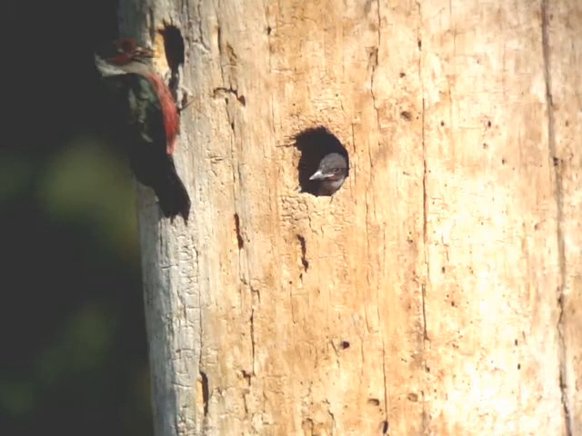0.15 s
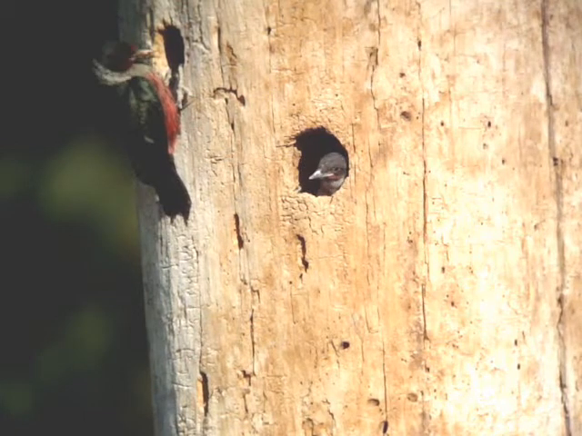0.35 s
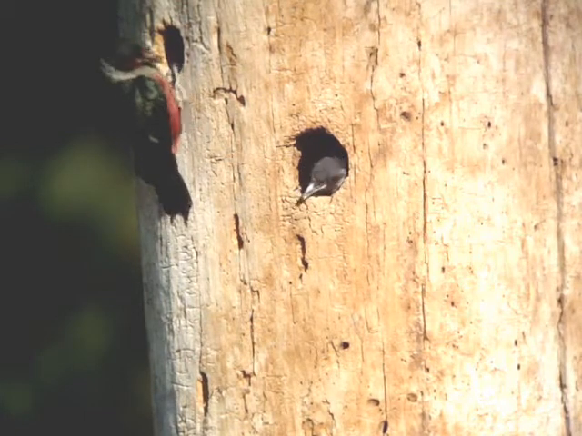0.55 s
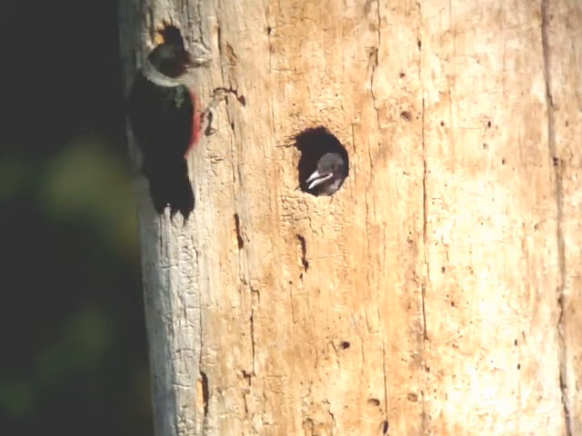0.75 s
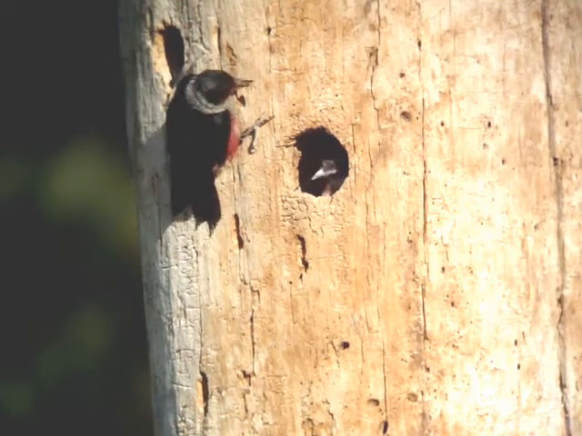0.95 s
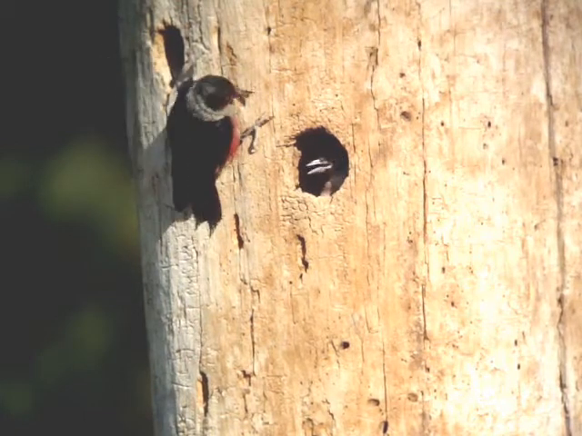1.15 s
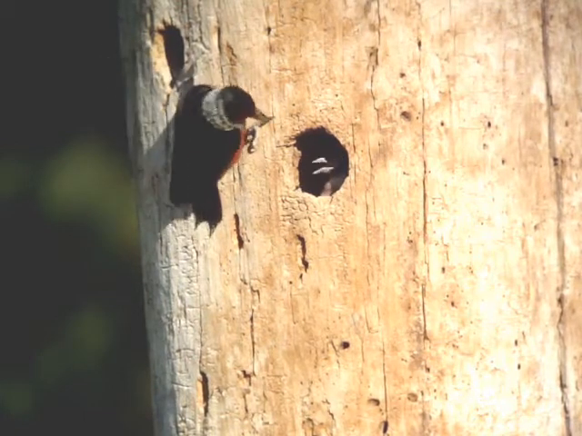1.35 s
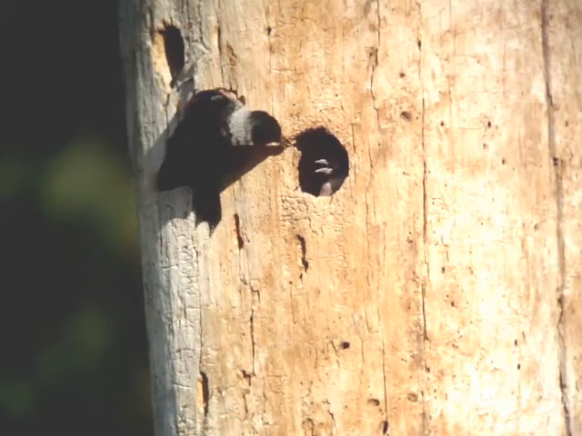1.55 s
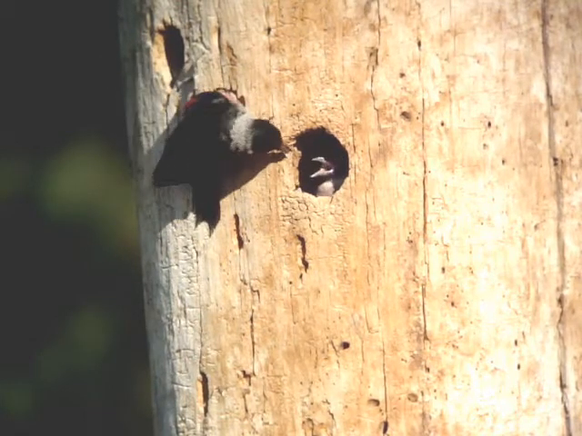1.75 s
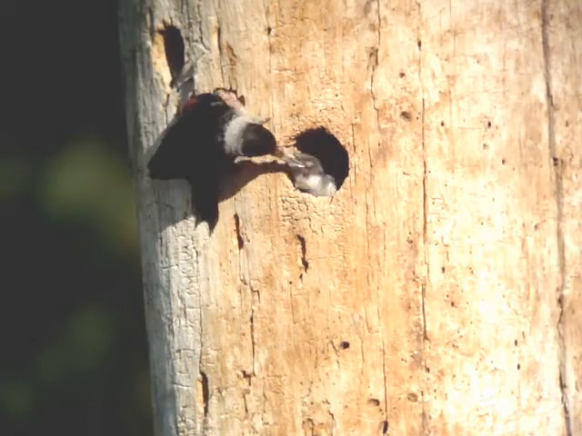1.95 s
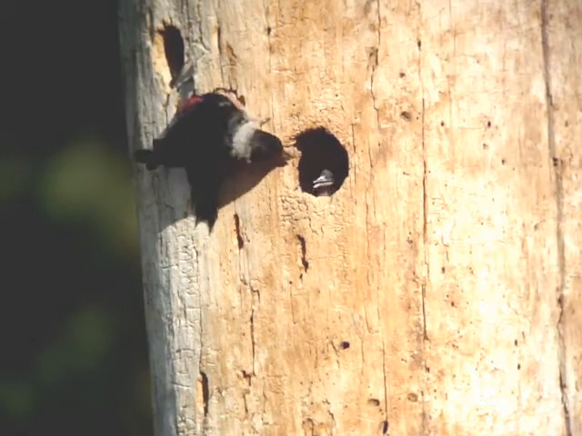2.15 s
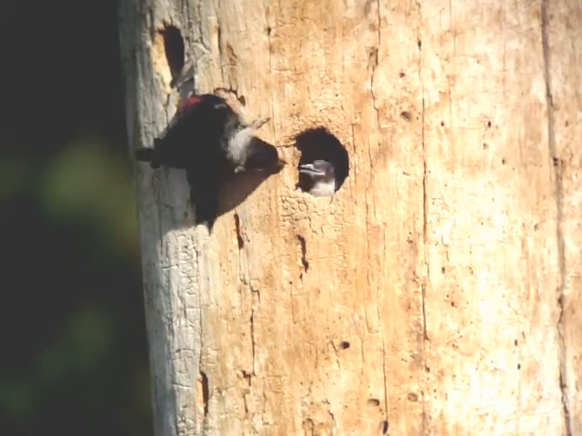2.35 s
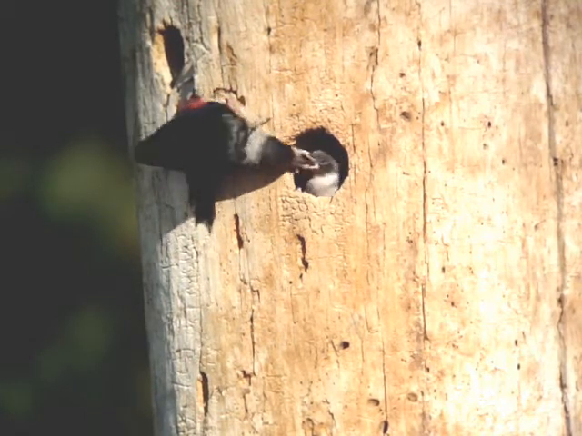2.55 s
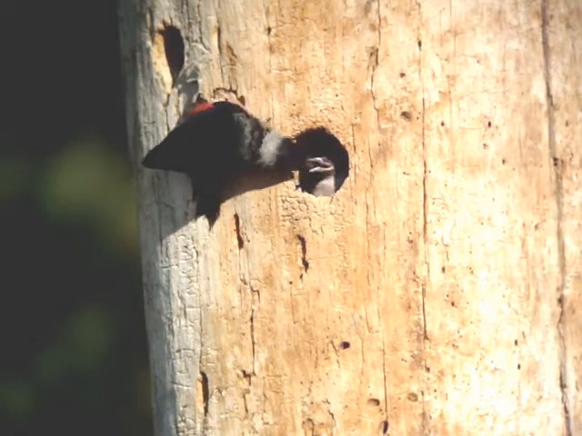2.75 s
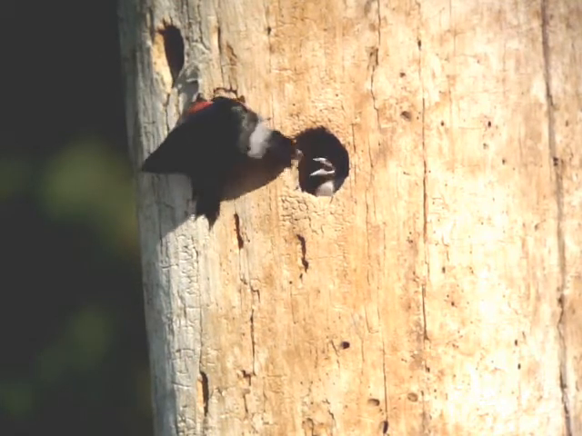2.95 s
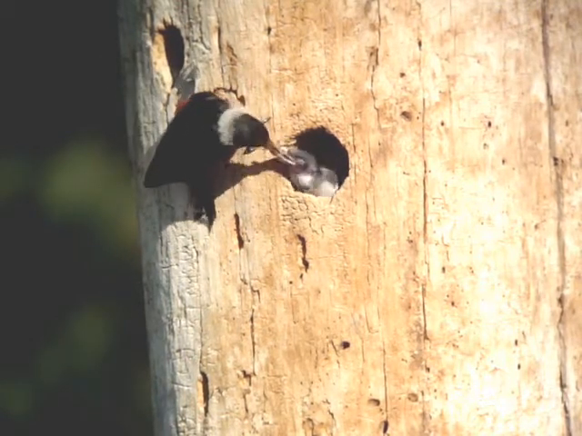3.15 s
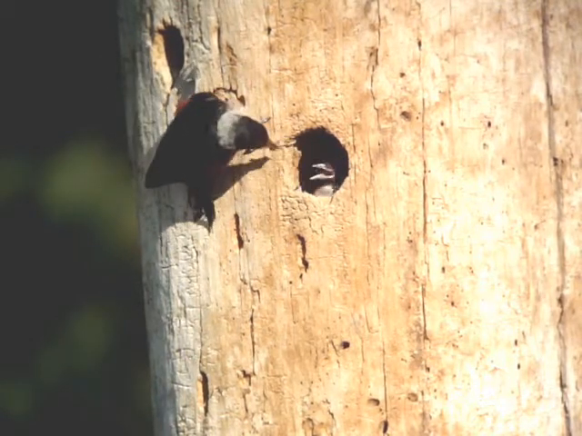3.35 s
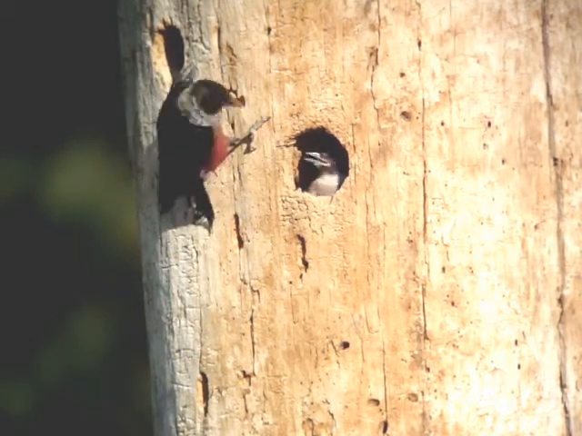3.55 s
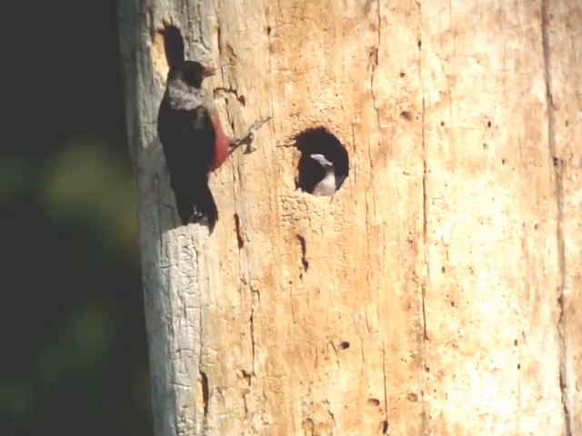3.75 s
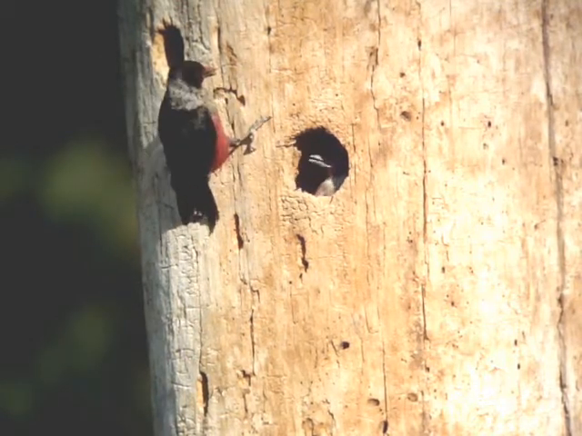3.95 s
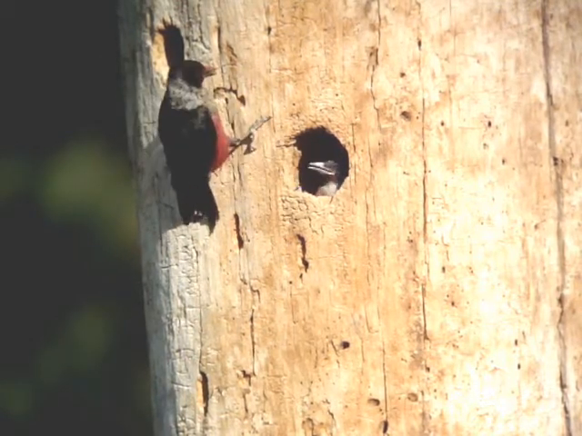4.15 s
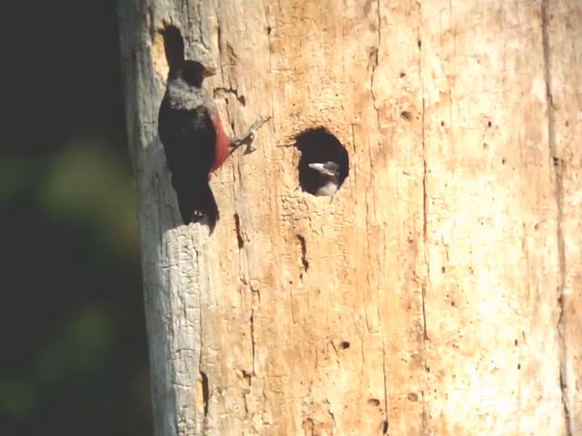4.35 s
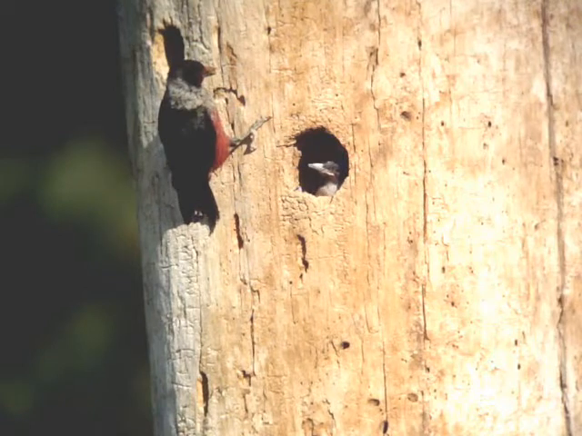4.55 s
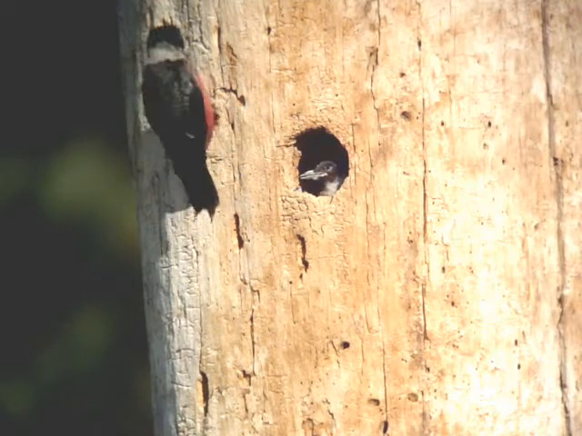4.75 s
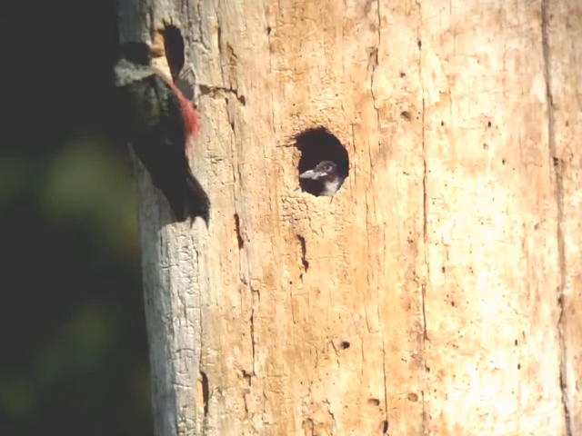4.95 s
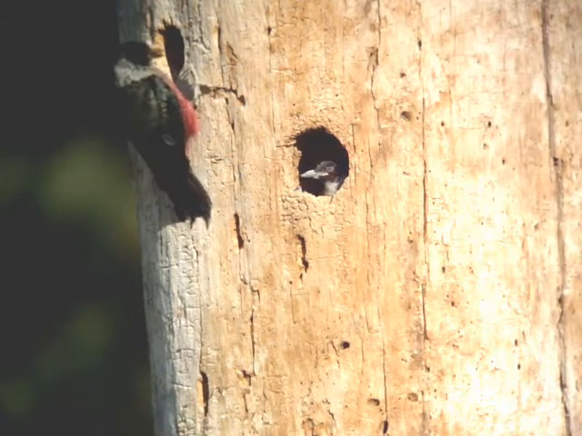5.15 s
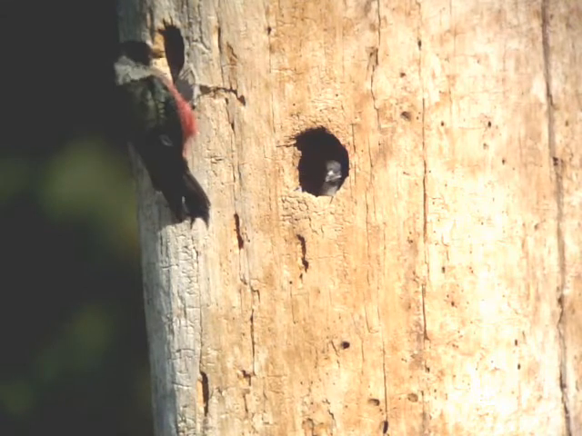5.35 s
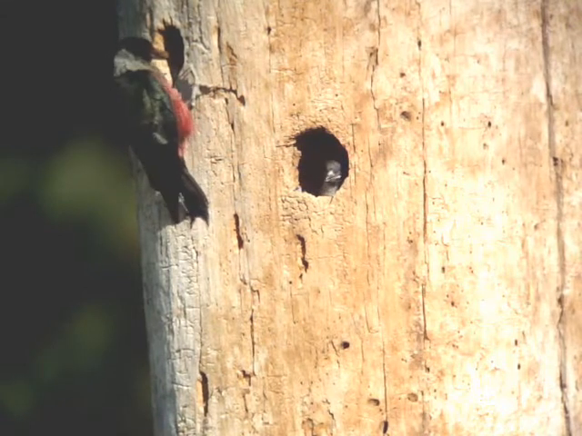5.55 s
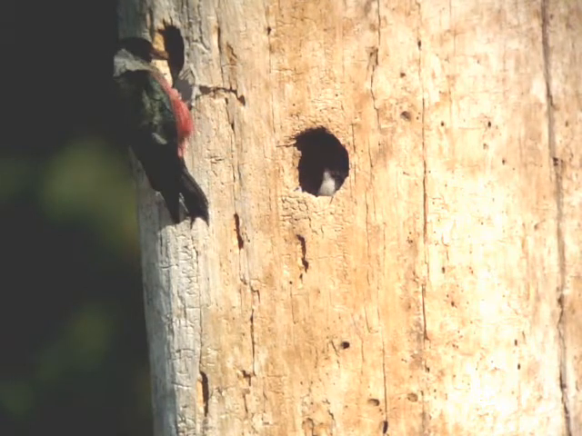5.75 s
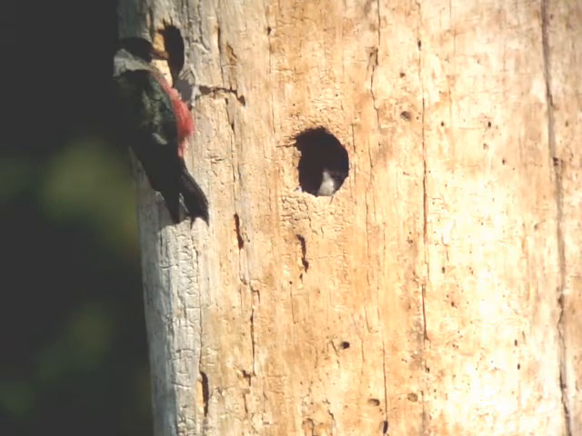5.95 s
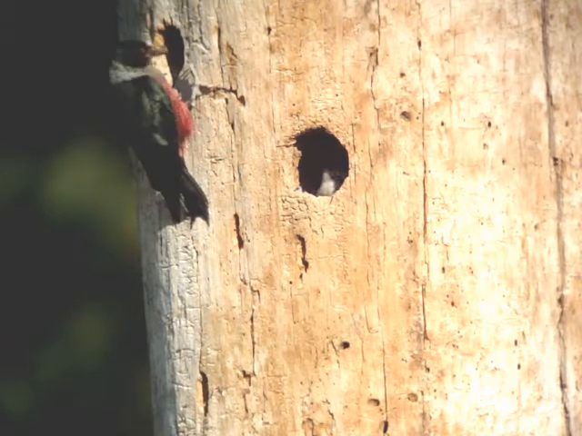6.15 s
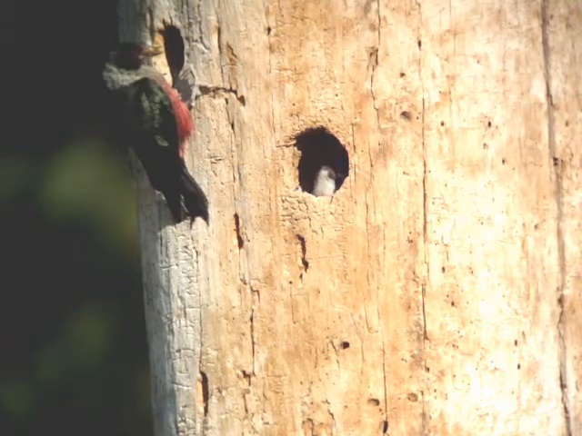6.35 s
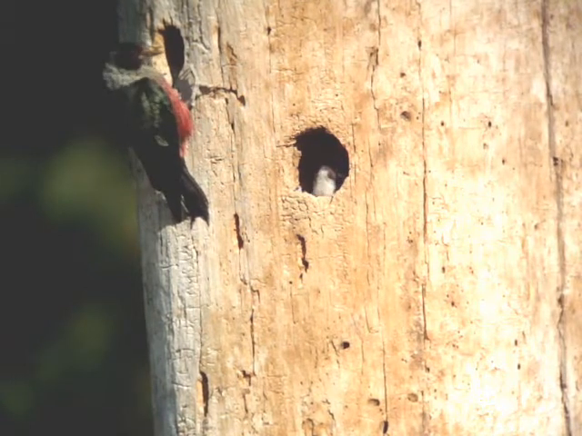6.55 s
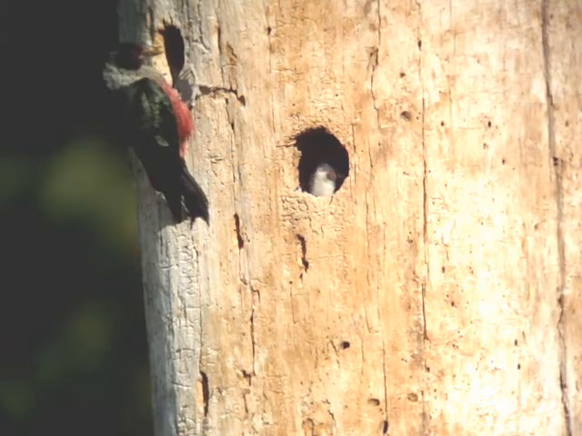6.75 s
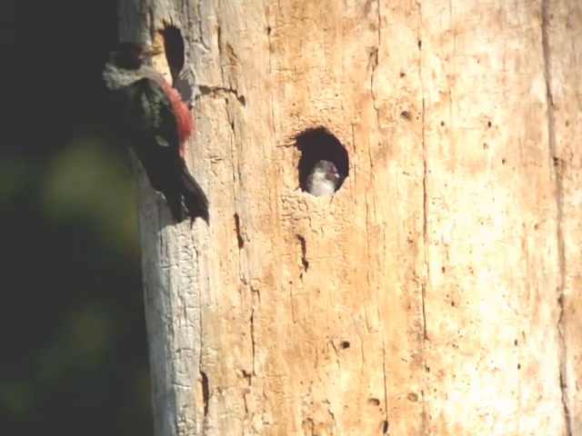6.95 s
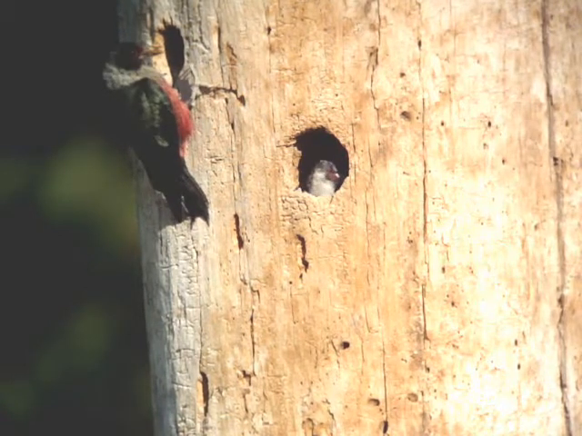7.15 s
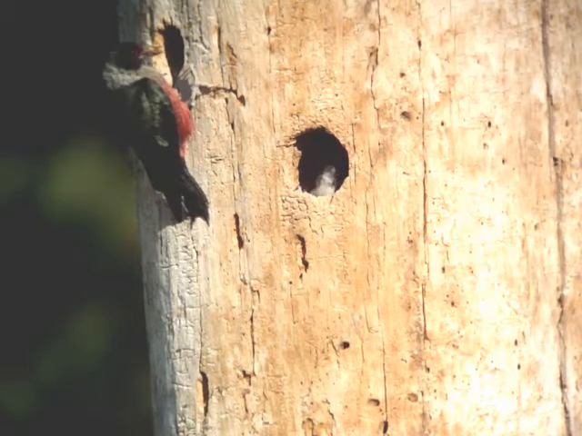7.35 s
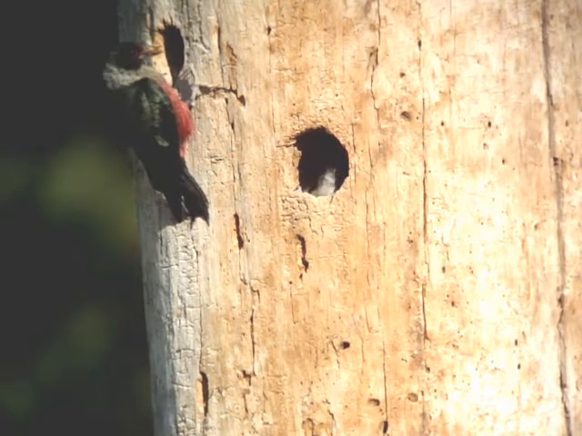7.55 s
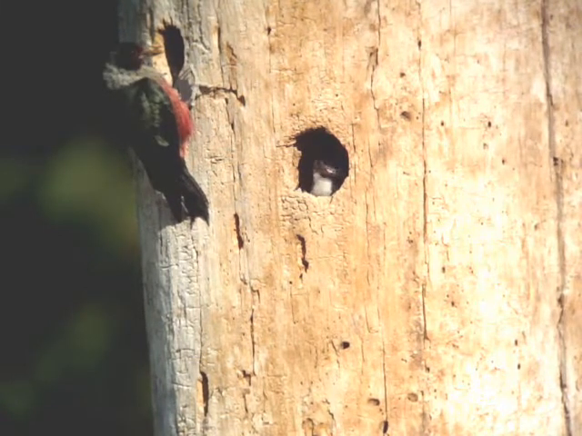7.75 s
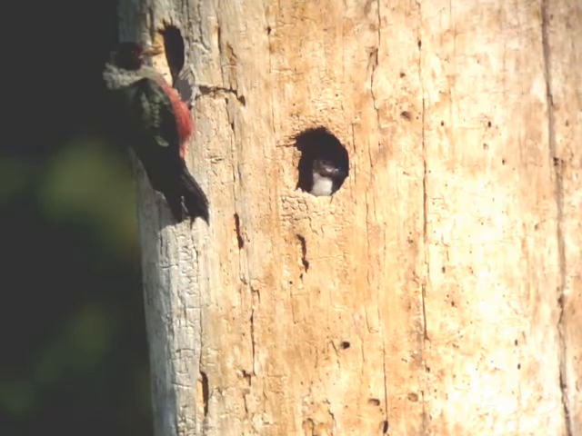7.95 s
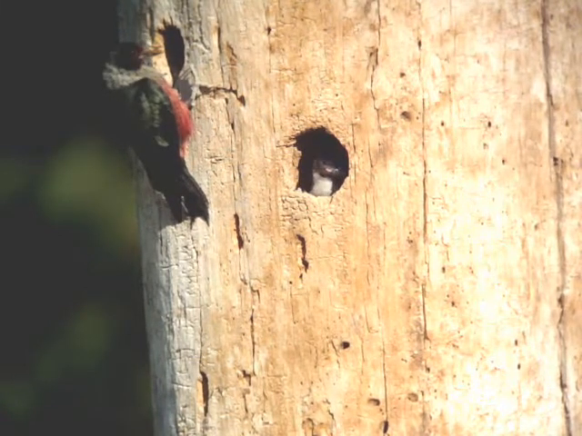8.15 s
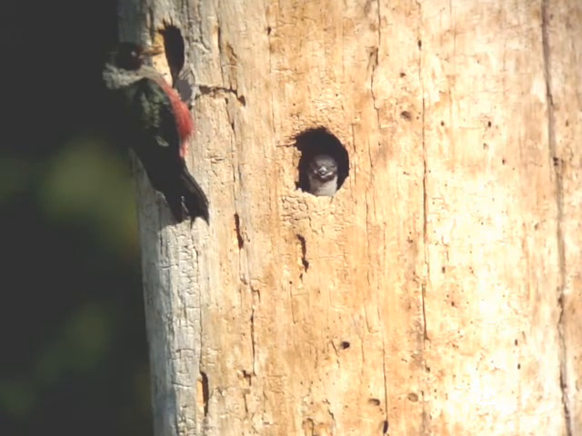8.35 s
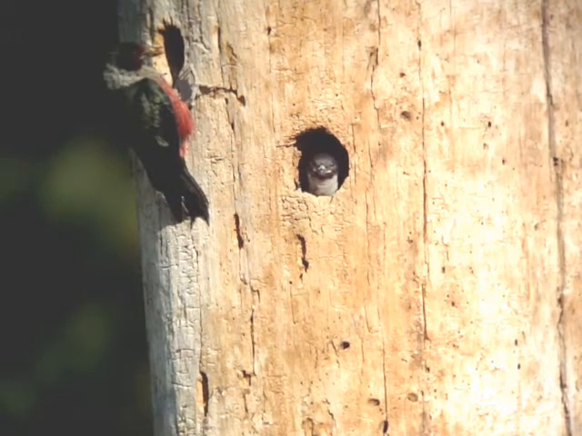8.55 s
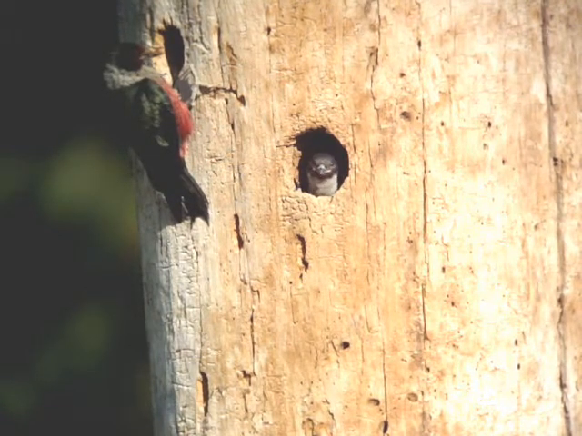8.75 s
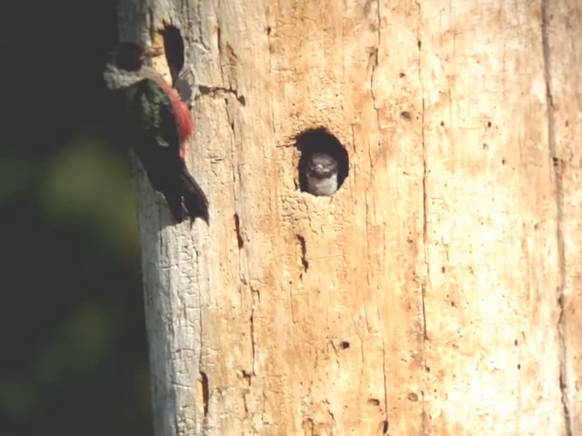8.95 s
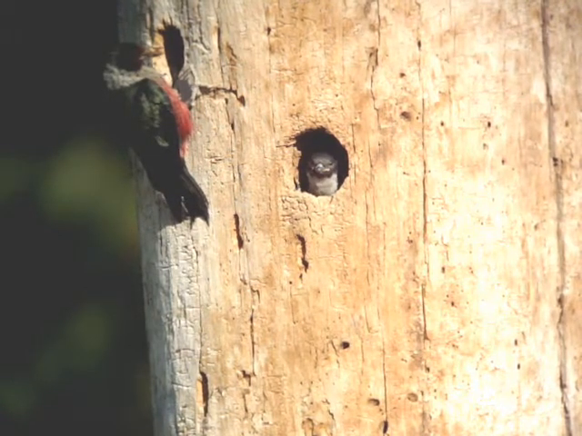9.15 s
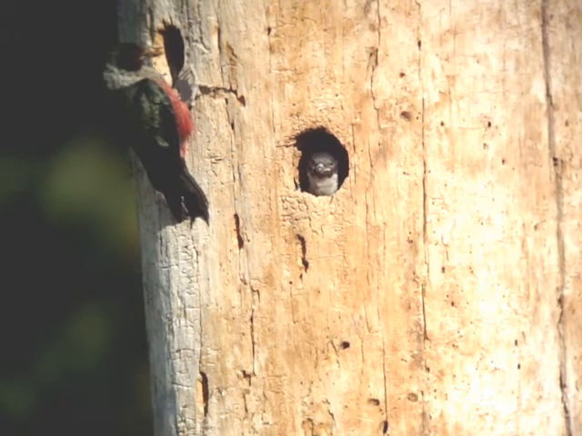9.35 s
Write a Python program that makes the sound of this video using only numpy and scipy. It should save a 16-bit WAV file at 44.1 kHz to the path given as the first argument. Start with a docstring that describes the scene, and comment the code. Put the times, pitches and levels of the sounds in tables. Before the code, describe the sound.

Quiet woodland with a soft, even hush. One young bird begs with scratchy, noisy, nasal squawks, some sagging in pitch as they fade. During feeding the voice turns frantic, with abrupt cracks and very short high whistled squeaks. It then settles into separate raspy calls, weaker around six to seven seconds, and ends with a rapid low chatter. The microphone hears it clearly, with tight reflections from the hole and a slight dull echo from the trees.

```python
"""In a wood, at a hole in a dead trunk, a woodpecker nestling begs while a parent comes to feed it.
A short stuttering churr opens and closes the series. Between them a rough, chaotic syrinx rasps near 2 kHz
through fixed throat resonances, and at the feeding a pure tone breaks out in clear squeals.
Close reflections of the hole and a faint far scatter are decaying noise; shaped noise gives the even hush."""
import sys
import numpy as np
from scipy import signal
from scipy.fft import rfft, irfft, next_fast_len
from scipy.io import wavfile
from scipy.ndimage import uniform_filter1d

SR = 44100
rng = np.random.default_rng(int(sys.argv[2]) if len(sys.argv) > 2 else 0)


def transcribe(u):
    """Save the signal u as a 16-bit wav file named by the first command-line argument.

    u: samples, shape (n,) or (channels, n), limited to [-1, 1]; the rate is SR.
    q: integer samples, one column per channel.
    """
    v = np.clip(np.atleast_2d(u).T, -1, 1)
    q = np.round(v * 32767).astype(np.int16)
    wavfile.write(sys.argv[1], SR, q)


N = 418509
T = np.arange(N) / SR  # seconds
FREQS = np.arange(N // 2 + 1) * SR / N  # Hz

# Far air in the trees with the hiss of the microphone, as a relative spectrum.
# Each row: frequency in Hz, density in dB per Hz.
HUSH_SPECTRUM = [(25, -16), (65, -7.5), (85, -3), (105, -3), (200, 0), (330, 0.5), (1000, -3), (2000, -6),
                 (3000, -7), (5000, -10), (9900, -13.5), (10200, -24.5), (12500, -26.5), (15500, -23)]

# Stuttered notes of the churrs.
# Each row: centre in seconds, length in seconds, level in dB, pitch in Hz before its arch,
# roughness (0 clear, held to 1 at most).
CHURR_NOTES = [ (.124, .022, -42, 1500, 0.73), (0.147, 0.027, -41.5, 1490, .4),
               (0.166, 0.015, -43, 1502, 1.06), (0.194, 0.01, -41, 1370, 0.68),
               (0.224, .012, -45.5, 1334, 0.63), (0.258, 0.024, -51.5, 1323, 0.9),
               (8.902, 0.024, -42, 1430, 0.63), (8.916, 0.0205, -48.5, 1490, 0.51),
               (8.934, 0.017, -46, 1394, 0.97), (8.964, 0.026, -46, 1344, .95), (9, 0.013, -47, 1353, .6),
               (9.03, 0.014, -53, 1230, .7)]

# Colour of the churr through a nearly closed beak, as a relative spectrum.
# Each row: frequency in Hz, gain in dB.
CHURR_SPECTRUM = [(500, -32), (1200, -13), (1480, 4), (1900, -0.5), (3300, -3), (4400, -1), (4950, -1),
                  (5300, 4), (5700, -4), (6450, -1.5), (6900, 10.5), (7600, -10), (11000, -17.5),
                  (15500, -7)]

# Begging rasps, one row for each push of air; where pushes overlap, the later takes over.
# Each row: start, length, attack and hold in seconds, level in dB, fade after the hold in dB,
# level of the fundamental in dB, treble of the beak at first and at last in dB above the level,
# pitch in Hz, sag in Hz.
AIR_PUSHES = [ (.52, 0.27, 0.033, .1, -40.5, 9, -47, -1, -2, 2070, 330),
              (.793, 0.21, 0.037, 0.16, -38.5, 21, -45.5, -1.5, -2, 2200, -150),
              (1.202, 0.25, .012, 0.099, -46.5, 2, -47.5, 2, -4.5, 2310, 20),
              (1.408, 0.21, 0.064, 0.096, -45.5, -0.5, -47, 3.5, 3.5, 2410, 20),
              (1.767, .24, .01, 0.125, -48, -5.5, -47.5, 17, 0.5, 2418, 20),
              (2.006, 0.12, 0.032, 0.057, -42, 11, -46, 4, 9.5, 2485, 550),
              (2.358, 0.15, 0.0094, 0.039, -48, 0, -48.5, 7.5, 6.5, 2386, 20),
              (2.505, 0.27, 0.024, .24, -42.5, 6, -46.5, 3, 5, 2200, 250),
              (2.933, 0.099, .006, 0.052, -48.5, -3.5, -46, 12, 11.5, 2295, 20),
              (3.009, .18, 0.022, 0.11, -44.5, -4, -47, 6, -5, 2407, 20),
              (3.19, .115, 0.018, .035, -38, 16, -47.5, 0.5, 6, 2450, 700),
              (3.475, .345, 0.01, 0.15, -44.5, 13.5, -45, 9.5, -4.5, 2357, 480),
              (4.079, 0.42, 0.0088, .2, -46.5, 10.5, -47, 0, -0.5, 2312, 240),
              (4.703, 0.44, 0.016, .03, -47, 14, -47, 0, 0, 2222, 230),
              (5.387, 0.29, 0.021, 0.021, -39.5, 21.5, -45.5, -3.5, -2.5, 2046, 340),
              (5.68, 0.17, 0.027, .07, -42, 18, -45.5, -4.5, -0.5, 1953, 80),
              (6.146, .24, 0.028, .08, -48, 9.5, -49.5, -2.5, -0.5, 2140, 260),
              (6.369, 0.19, .025, 0.089, -55.5, 5.5, -51, -.5, .5, 2124, 160),
              (6.86, 0.36, 0.021, .07, -48.5, 15.5, -51, -3, 0.5, 2147, 260),
              (7.451, 0.39, 0.015, .03, -51, 18.5, -53.5, -3, -1, 2035, 300),
              (7.832, 0.12, 0.039, 0.055, -45.5, 11, -50, -1, -2, 1850, 170),
              (8.368, .325, 0.056, .185, -45, 18.5, -48, -2.5, -2, 2040, 519)]

# Breaks, where the rasp snaps to a clearer, mostly lower note.
# Each row: centre in seconds, length in seconds, pitch in Hz, glide in Hz per second, roughness (0-1),
# level in dB, level of the fundamental in dB, treble of the beak in dB above the level.
VOICE_BREAKS = [ (0.742, .025, 1810, -1500, 0.65, -46.5, -48, -2.5),
                (2.38, .036, 1870, -500, 0.49, -44, -49, 7.5),
                (2.565, .052, 1225, -500, 0.25, -38.5, -57, 2.5),
                (2.619, .064, 1649, 5500, 0.22, -42, -49, 4), (2.715, .05, 1990, -1500, 0.3, -40, -42, 3),
                (2.764, 0.024, 1810, -2000, 0.6, -35.5, -43.5, -1),
                (2.985, .018, 1808, 1500, 0.25, -33.5, -46, 4),
                (3.056, .04, 2112, -500, .42, -45, -39.5, 2.5),
                (3.256, .014, 1248, -1500, 0.38, -51, -49, 15),
                (3.276, .022, 1205, -1500, .25, -36.5, -57, 1),
                (3.295, .018, 1444, -9000, 0.27, -46.5, -45, 6), (5.47, .035, 2072, 0, .68, -45, -45, -7),
                (7.875, .04, 1759, -1000, .62, -44.5, -52, -2),
                (8.447, 0.029, 1942, -1000, 0.32, -44.5, -45.5, -3),
                (8.597, .025, 1616, -1000, 0.51, -45, -49.5, -6),
                (8.649, 0.029, 1590, -1500, .55, -54.5, -51, -2)]

# Resonances of throat and beak.
# Each row: centre in Hz, width in Hz, gain in dB.
THROAT_RESONANCES = [(2166, 760, -7.5), (3610, 460, 5), (4590, 350, -2.5), (5277, 530, 10), (6745, 1010, 7),
                     (8580, 820, -2.5), (9700, 470, -1), (12660, 4400, -10.5), (14800, 472, -1.5),
                     (15400, 490, -8)]

# Clear squeals, swelling whistles that mostly slide down.
# Each row: start in seconds, length in seconds, pitch in Hz, fall in Hz, peak level in dB before flutter.
SQUEAL_NOTES = [ (2.052, 0.055, 5765, 1104, -28.5), (2.532, 0.0057, 5400, 0, -27),
                (2.541, 0.0079, 5420, 80, -24), (2.736, 0.0058, 5400, 0, -28),
                (2.743, .01, 5370, 103.5, -27.5), (2.936, 0.027, 5590, 100, -34.5),
                (3.215, .025, 5400, -86, -24), (3.238, 0.013, 5420, 305, -22.5),
                (3.256, 0.026, 4986, 267.5, -30)]

HUSH_DB = -55
# every push scoops up to its pitch, then most of them sag as the air runs out
SCOOP_HZ, SCOOP_S, SAG_POWER = 260.1, .035, 2.3
# it opens with an accent that the beak's treble shares in part
ACCENT_DB, ACCENT_S, TREBLE_ACCENT_SHARE = 5, 0.02, 0.64
# the fundamental shares about a third of the fade
FADE_POWER, FUNDAMENTAL_FADE_SHARE, RELEASE_S = 0.87, 0.33, .012
# the rasp frays as it fades, and is a little clearer with more treble from the beak
RASP_ROUGH, ROUGH_PER_DB_OF_FADE, ROUGH_PER_DB_OF_TREBLE = .86, .007, -0.0062
BREAK_SNAP_S = .002  # sets how fast the voice snaps over
SQUEAL_ARCH = 0.68  # power of the arch that a squeal's strength follows
LOCK_DB = -39  # squeal strength that takes the rasp's treble down by 3 dB
TOP_HZ = 15800


def undb(db):
    """Decibels to gain."""
    return 10 ** (np.asarray(db) / 20)


def unit(x):
    """Scale to rms 1."""
    return x / np.sqrt(np.mean(x ** 2))


def steady(x, count=1000):
    """Hold the running rms over count samples near 1, leaving the fast grain."""
    power = np.abs(uniform_filter1d(x ** 2, count))
    return x / np.sqrt(power + 1e-12)


def shape(x, gain):
    """Filter with a gain given at every frequency."""
    size = next_fast_len(N)
    bins_hz = np.arange(size // 2 + 1) * SR / size
    return irfft(rfft(x, size) * np.interp(bins_hz, FREQS, gain), size)[:N]


def colour(points):
    """Gain through (Hz, dB) points on a log-frequency axis."""
    hz, db = np.transpose(points)
    return undb(np.interp(np.log(FREQS + 1), np.log(hz), db))


def lowpass(x, order, hz):
    """Butterworth filter that keeps what lies below about hz."""
    return signal.sosfilt(signal.butter(order, min(hz, SR / 3), fs=SR, output="sos"), x)


def wobble(hz):
    """Random motion of spread 1, up to about hz."""
    return unit(lowpass(rng.standard_normal(N), 2, hz))


def turns(hz):
    """Phase in radians of a tone whose frequency follows hz."""
    return 2 * np.pi * np.cumsum(hz) / SR


def hush(sway_db=0.22):
    """Far air in the trees, barely swaying, with an even hiss on top."""
    air = unit(shape(rng.standard_normal(N), colour(HUSH_SPECTRUM)))
    return air * undb(HUSH_DB + sway_db * wobble(5.6))


def syrinx(hz, rough, jitter=.06, jitter_hz=800, lurch=.045, lurch_hz=110, slope_db=-1.5, air_db=2,
           half_db=-6, rattle_hz=540, rattle=1.0, taut_hz=2300, flutter_db=1.5, flutter_hz=170):
    """A membrane whose period and strength turn chaotic with roughness; air hisses through at each opening."""
    unrest = jitter * wobble(jitter_hz) + lurch * wobble(lurch_hz)
    phase = turns(hz * (1 + rough * unrest))
    # overtones fall by slope_db per octave, and lag so that the wave has no sharp spike
    tone = unit(sum(undb(slope_db * np.log2(k)) * np.cos(k * phase + k * k) for k in range(1, 9)))
    # at low pitch the slack membrane rattles and doubles its period, which puts lines between the harmonics
    slack = rough * np.clip((taut_hz - hz) / 400, 0, 1)
    rattling = np.cos(turns(rattle_hz * (1 + .15 * wobble(40.44))))
    tone = tone * (1 + rattle * slack * rattling)
    halves = undb(half_db) * slack * wobble(65) * (np.cos(3 * phase / 2) + np.cos(5 * phase / 2))
    hiss = rough ** 1.3 * unit((1 + .3 * np.cos(phase)) * rng.standard_normal(N))
    return (tone + halves + undb(air_db) * hiss) * undb(flutter_db * rough * wobble(flutter_hz))


def stutter(arch=.14):
    """Notes chopped some forty times a second: their strength, arching pitch and roughness."""
    gate, hz, rough = np.zeros((3, N))
    for centre, length, db, pitch_hz, roughness in CHURR_NOTES:
        away = np.abs(2 * (T - centre) / length)
        on = away < 2
        swell = np.exp(-away[on] ** 3)
        note = undb(db) * swell
        gate[on] += note
        # where notes overlap, pitch and roughness are averaged by strength
        hz[on] += note * pitch_hz * (1 + arch * swell * (.4 - away[on]))
        rough[on] += note * roughness
    return gate, hz / (gate + 1e-12), rough / (gate + 1e-12)


def churrs(source, gate):
    """Low, thin notes through a nearly closed beak."""
    return gate * steady(shape(source, colour(CHURR_SPECTRUM)))


def wood(x, near_db=-11, near_t60=0.084, far_db=-24, far_t60=0.57, damp_hz=4500):
    """Quick reflections from the nest hole and trunk, then a dull scatter from the trees."""
    t = T[:SR]
    t60 = np.array([[near_t60], [far_t60]])  # seconds to die away by 60 dB
    near, far = rng.standard_normal((2, SR)) * (t > .001) * np.exp(-np.log(1000) * t / t60)
    far = lowpass(far, 1, damp_hz)
    echoes = undb(near_db) * near / np.linalg.norm(near) + undb(far_db) * far / np.linalg.norm(far)
    return x + signal.fftconvolve(x, echoes)[:N]


def pushes():
    """Controls of the begging voice: gains of fundamental, throat band and treble, then pitch and roughness."""
    gains = np.zeros((3, N))
    hz = np.full(N, float(AIR_PUSHES[0][-2]))
    rough = np.full(N, float(RASP_ROUGH))
    for (start, length, attack, hold, db, fade_db, low_db,
         first_db, last_db, pitch_hz, sag_hz) in AIR_PUSHES:
        on = (T >= start) & (T < start + length + 6 * RELEASE_S)
        age = T[on] - start
        spent = np.clip((age - hold) / max(length - hold, .01), 0, 1) ** FADE_POWER
        effort = db - fade_db * spent
        accent = ACCENT_DB * np.exp(-age / ACCENT_S)
        beak = first_db + (last_db - first_db) * spent
        fundamental = low_db - FUNDAMENTAL_FADE_SHARE * fade_db * spent
        treble = effort + beak + TREBLE_ACCENT_SHARE * accent
        levels = undb([fundamental, effort + accent, treble])
        release = np.exp(-np.maximum(age - length, 0) / RELEASE_S)
        # each attack crossfades from whatever the push before left sounding
        rise = np.sin(np.pi / 2 * np.minimum(age / attack, 1)) ** 2
        gains[:, on] += rise * (levels * release - gains[:, on])
        sag = sag_hz * np.minimum(age / length, 1) ** SAG_POWER
        hz[on] = pitch_hz - SCOOP_HZ * np.exp(-age / SCOOP_S) - sag
        fray = ROUGH_PER_DB_OF_FADE * max(fade_db, 0) * spent
        rough[on] = RASP_ROUGH + fray + ROUGH_PER_DB_OF_TREBLE * beak
    return np.vstack([gains, hz, rough])


def breaks(controls):
    """For a moment the controls snap over to a clearer, mostly lower note, then back to the rasp."""
    out = controls.copy()
    for centre, length, pitch_hz, glide, rough, db, low_db, beak_db in VOICE_BREAKS:
        on = np.abs(T - centre) < length
        t = T[on] - centre
        grip = (1 + np.tanh((length / 2 - np.abs(t)) / (2 * BREAK_SNAP_S))) / 2
        note = np.broadcast_arrays(undb(low_db), undb(db), undb(db + beak_db), pitch_hz + glide * t, rough)
        out[:, on] += grip * (np.array(note) - out[:, on])
    return out


def throat(x, leak_db=-25):
    """Resonances of throat and beak, with a little sound leaking between them."""
    power = sum(undb(2 * db) / (1 + ((FREQS - hz) / width * 1.59) ** 2) ** 2
                for hz, width, db in THROAT_RESONANCES)
    return shape(x, np.sqrt(power + undb(2 * leak_db)))


def rasps(source, bands, squeal, gape_hz=4500, gape_width_hz=480, gape_db=11, wide_db=-32, low_noise_db=-27):
    """The throat colours the rasp; the wider the beak opens, the more treble leaves it."""
    gains = np.array(bands)
    voice = throat(source)
    # a wide gape adds a resonance of its own, full once the treble reaches wide_db
    gape = undb(gape_db) * np.minimum(gains[2] / undb(wide_db), 1)
    voice = voice + gape * shape(voice, 1 / (1 + ((FREQS - gape_hz) / gape_width_hz) ** 2))
    # a dull low noise swells with the loud, bright rasps up to a ceiling, perhaps overload
    low_noise_colour = colour([(100, -4.0), (400, -1), (1000, 4), (2500, -32), (8000, -47)])
    noise = unit(shape(rng.standard_normal(N), low_noise_colour))
    low_noise = undb(low_noise_db) * np.minimum(gains[2], undb(-26)) * noise
    # a squeal takes over the air flow, and the rasp loses treble
    gains[2] /= np.sqrt(1 + (uniform_filter1d(squeal, size=700) / undb(LOCK_DB)) ** 2)
    under = 1 / (1 + (FREQS / 2900) ** 24)
    over = 1 - 1 / (1 + (FREQS / 4200) ** 24)
    split = (under, 1 - under - over, over)
    return low_noise + sum(gain * steady(shape(voice, band)) for gain, band in zip(gains, split))


def squeals(overtone_db=-13, side_hz=1480, side_db=-21, jitter=.006, flutter_db=.4):
    """One side of the syrinx locks into a whistle, the slower side puts bands beside it; also its strength."""
    hz, strength = np.full(N, 5000.), np.zeros(N)
    for start, length, pitch_hz, fall_hz, db in SQUEAL_NOTES:
        on = (T >= start) & (T < start + length)
        along = (T[on] - start) / length
        hz[on] = pitch_hz - fall_hz * along
        strength[on] = undb(db) * np.abs(np.sin(np.pi * along)) ** SQUEAL_ARCH
    strength = uniform_filter1d(strength, size=60)
    phase = turns(hz * (1 + jitter * wobble(466)))
    beat = np.cos(turns(side_hz * (1 + 0.0504 * wobble(397))))
    # overtones flash up as they sweep through the upper resonances
    overtones = undb(overtone_db) * throat(np.sin(2 * phase) + np.sin(3 * phase) / 2)
    whistle = (np.sin(phase) + overtones) * (1 + 2 * undb(side_db) * beat)
    return np.sqrt(2) * whistle * strength * undb(flutter_db * wobble(270)), strength


def scene(squeal_dry=0.33):
    """The nestling's voice in the wood; the shrill squeals beam straight out of the hole and echo less."""
    gate, churr_hz, churr_rough = stutter()
    *bands, hz, rough = breaks(pushes())
    churring = gate > 0
    pitch = np.where(churring, churr_hz, hz)
    roughness = np.clip(np.where(churring, churr_rough, rough), 0, 1)
    source = syrinx(pitch, roughness)
    squeal, strength = squeals()
    direct = np.clip(squeal_dry, 0, 1)  # share of the squeals that stays free of echo
    voice = churrs(source, gate) + rasps(source, bands, strength) + (1 - direct) * squeal
    return (wood(voice) + direct * squeal + hush())[None]


def record(dry):
    """The recorder cuts the top with a steep low-pass filter."""
    return signal.sosfilt(signal.ellip(10, .2, 70, TOP_HZ, fs=SR, output="sos"), dry)


dry = scene()
out = record(dry)
transcribe(out)
```